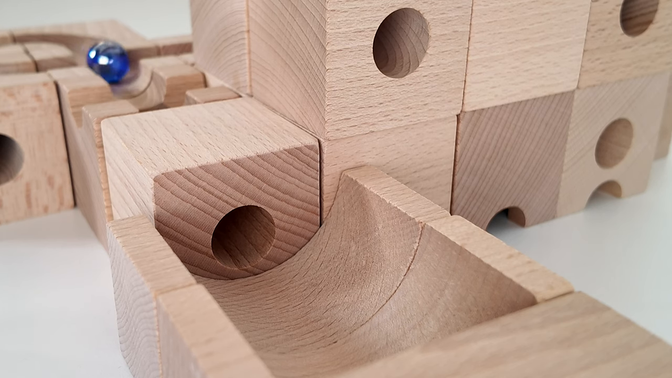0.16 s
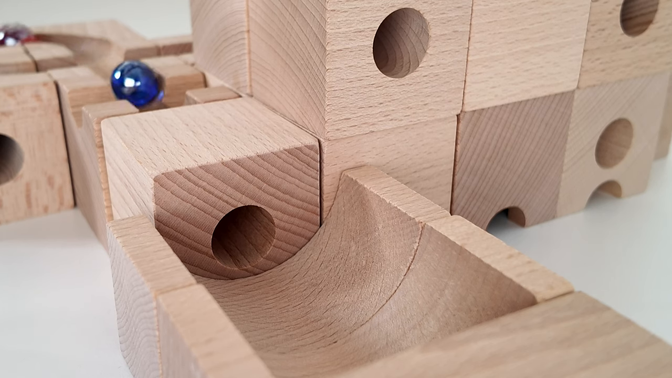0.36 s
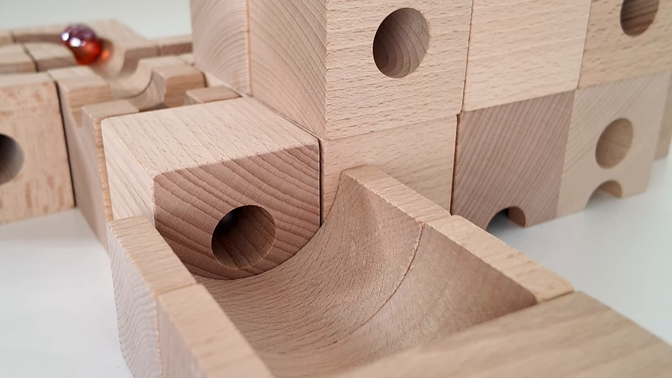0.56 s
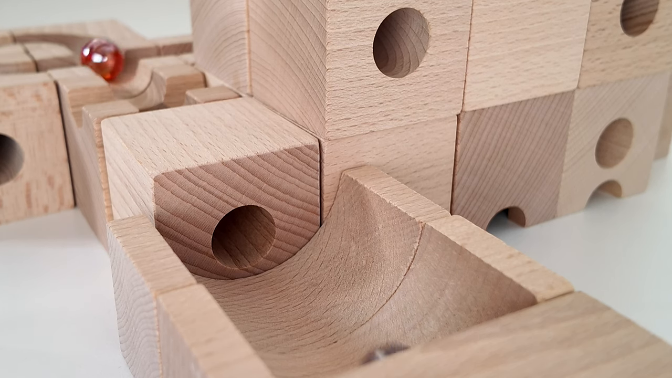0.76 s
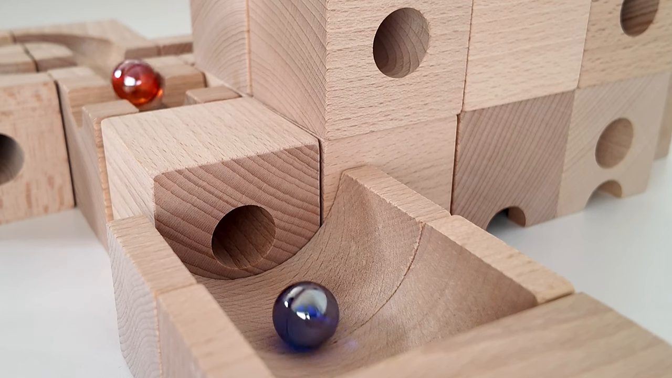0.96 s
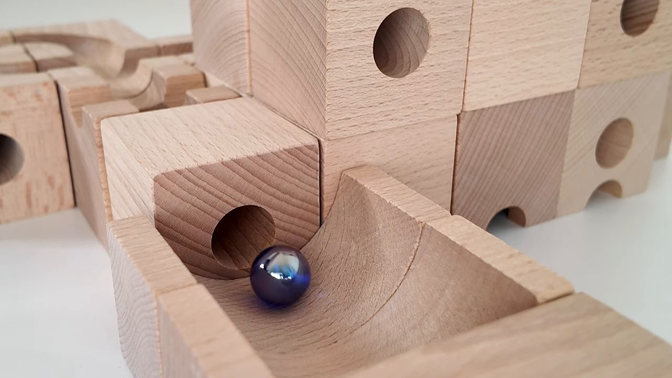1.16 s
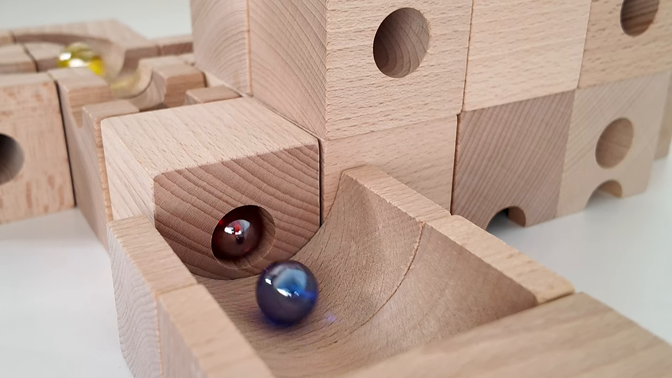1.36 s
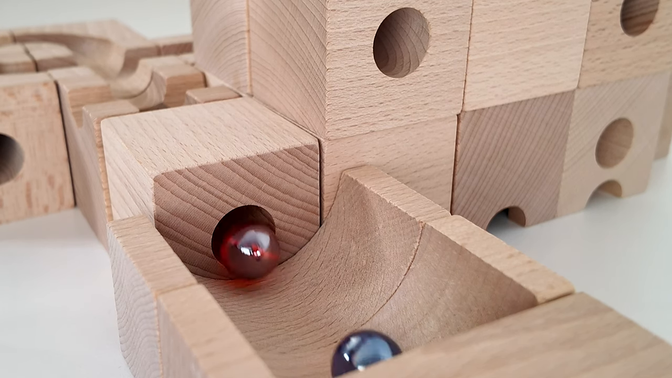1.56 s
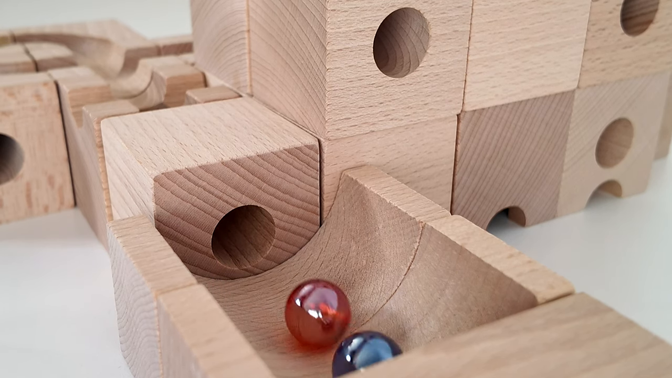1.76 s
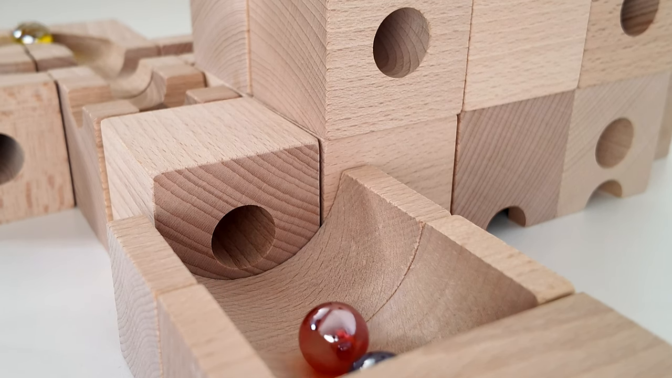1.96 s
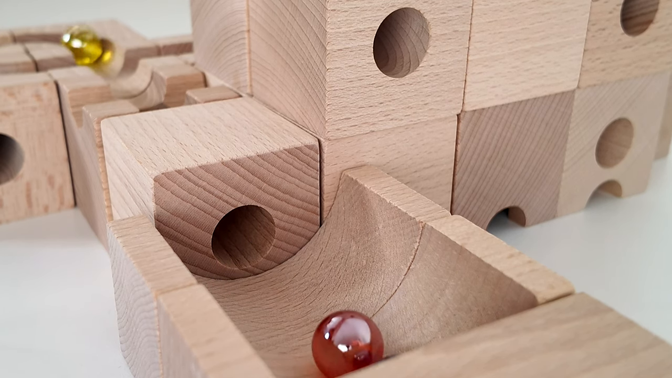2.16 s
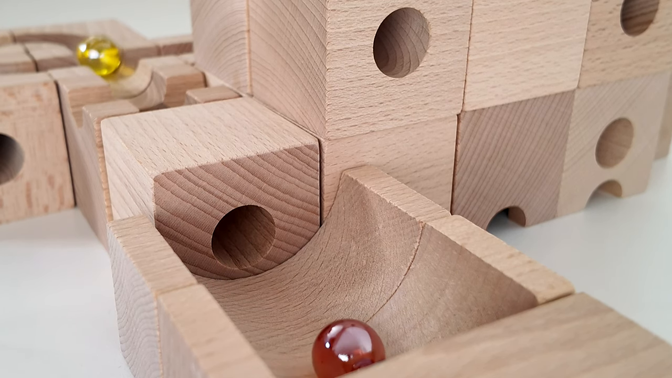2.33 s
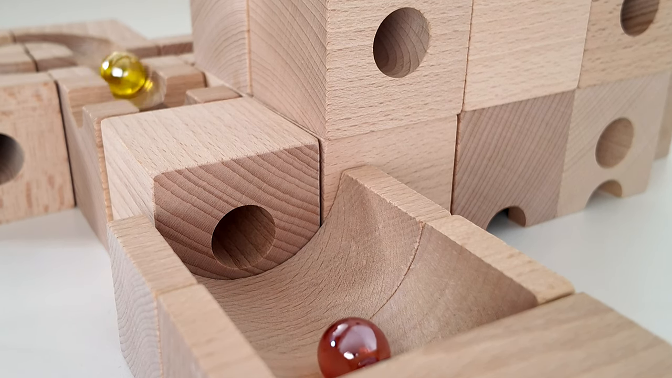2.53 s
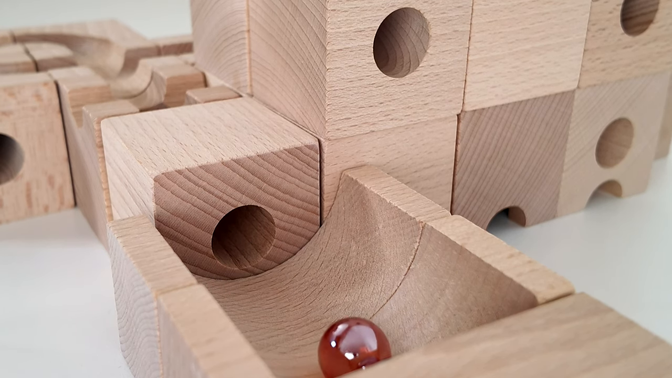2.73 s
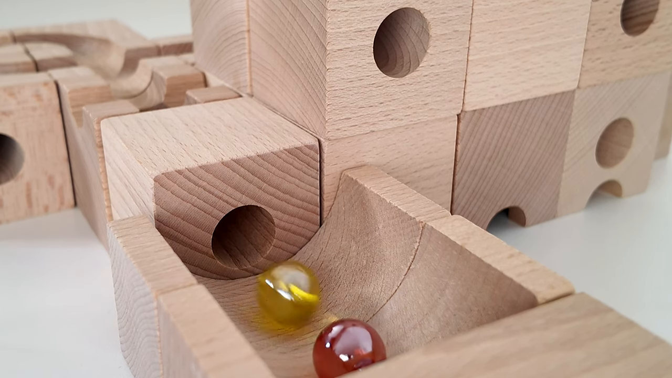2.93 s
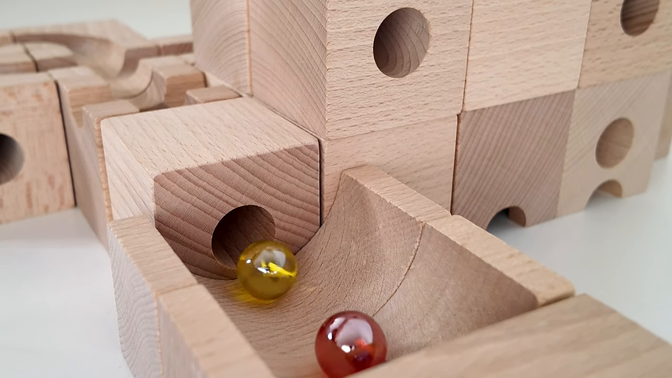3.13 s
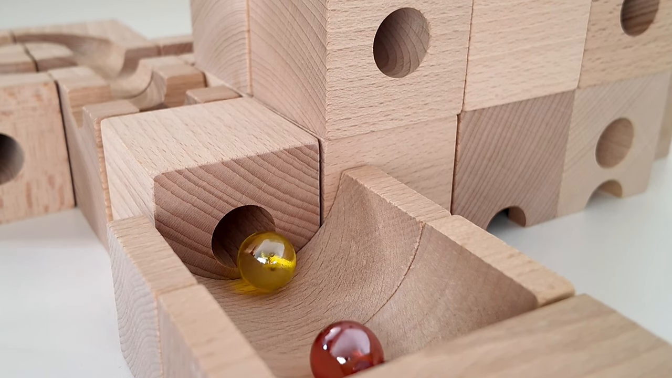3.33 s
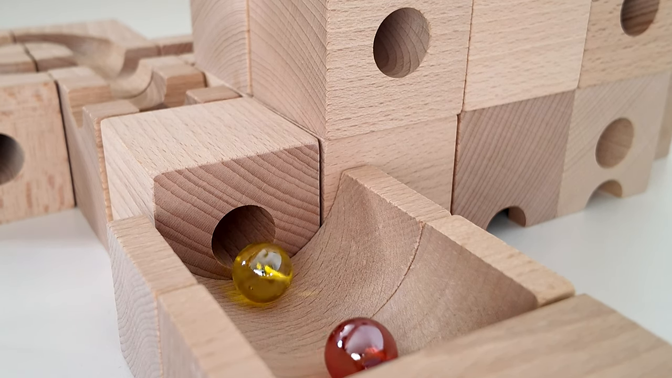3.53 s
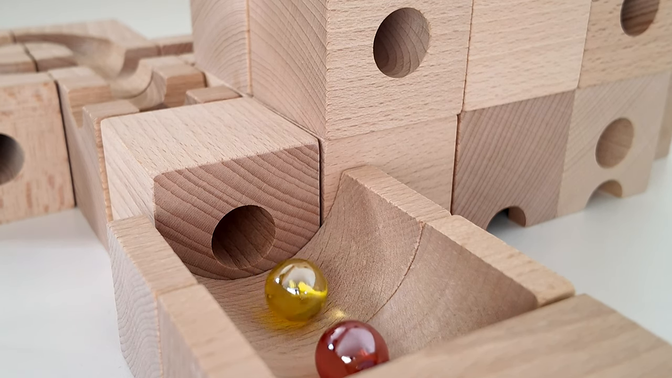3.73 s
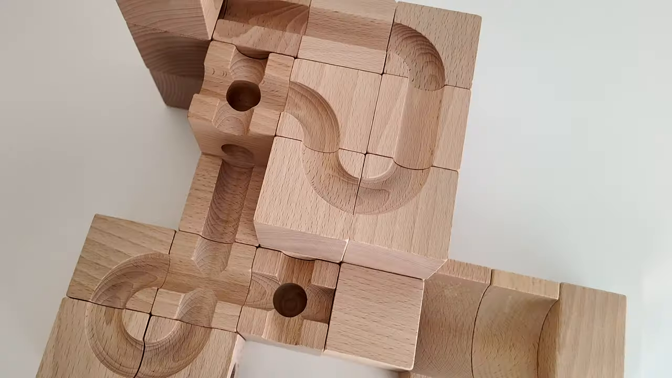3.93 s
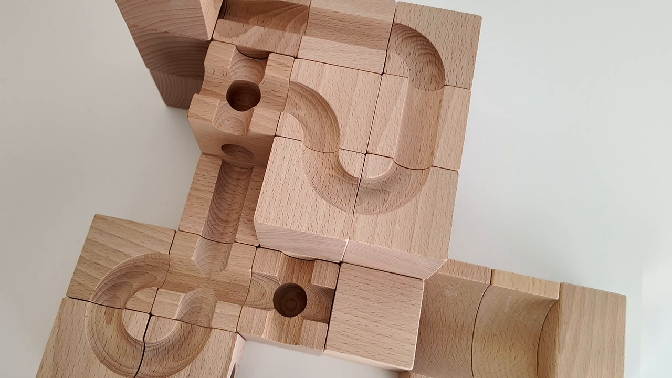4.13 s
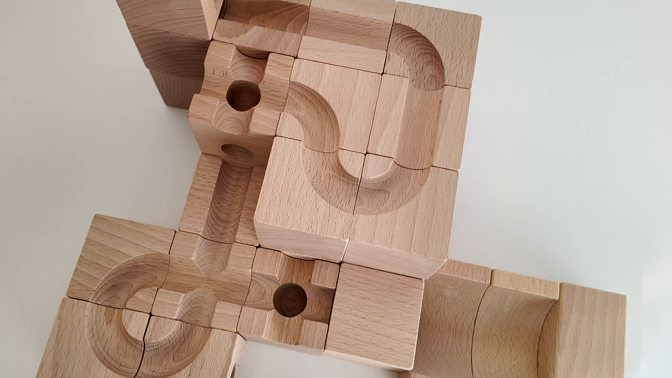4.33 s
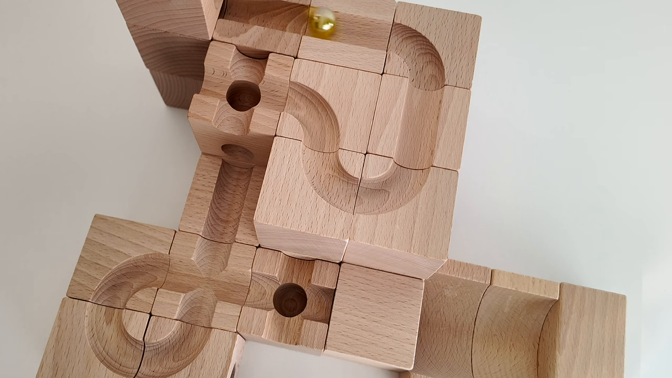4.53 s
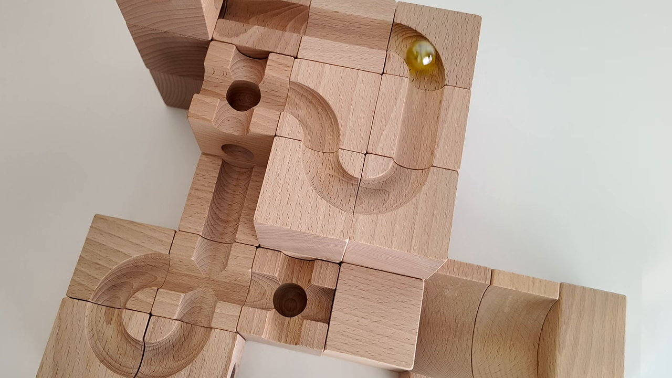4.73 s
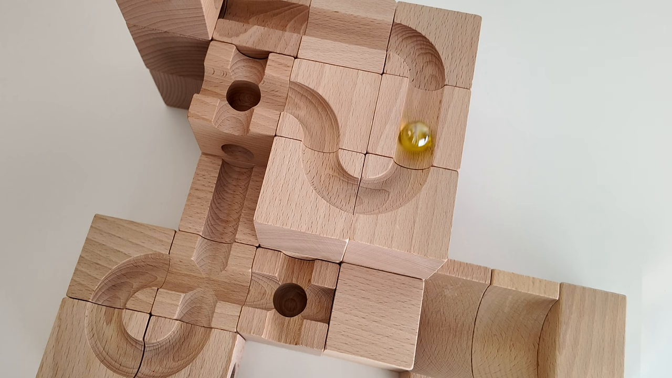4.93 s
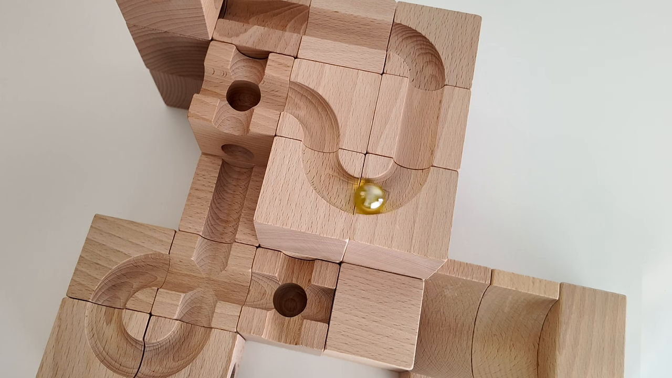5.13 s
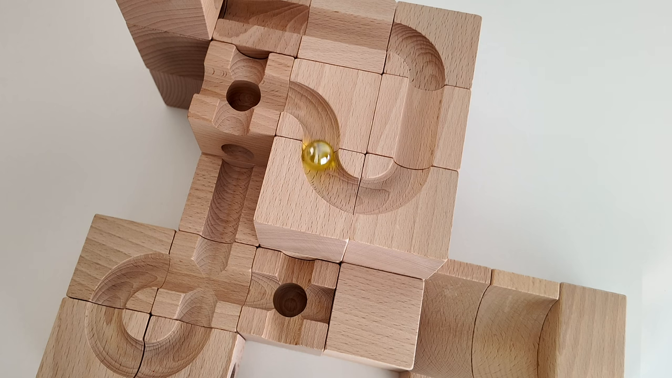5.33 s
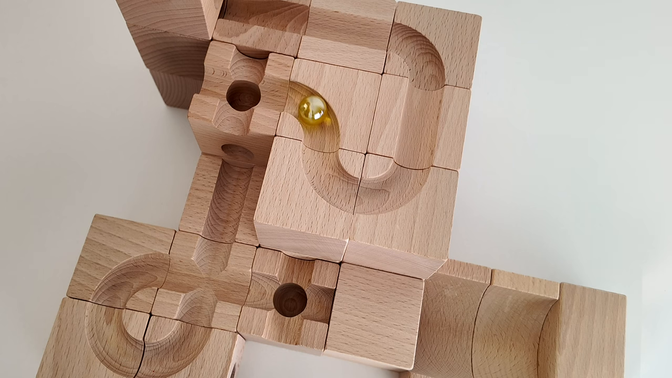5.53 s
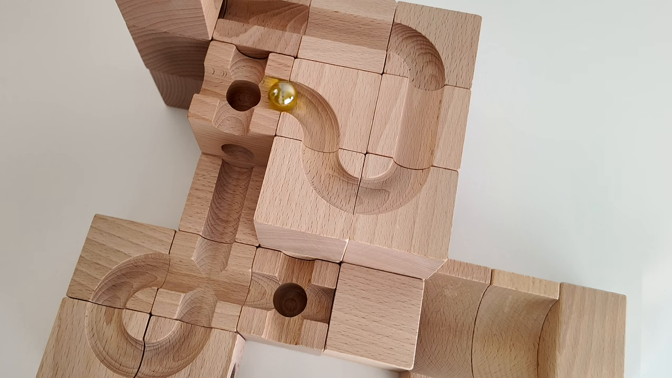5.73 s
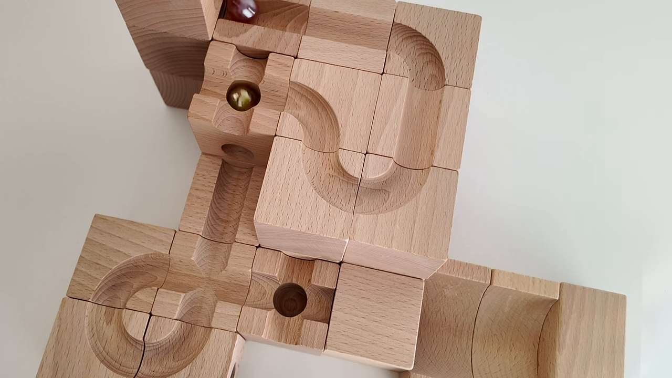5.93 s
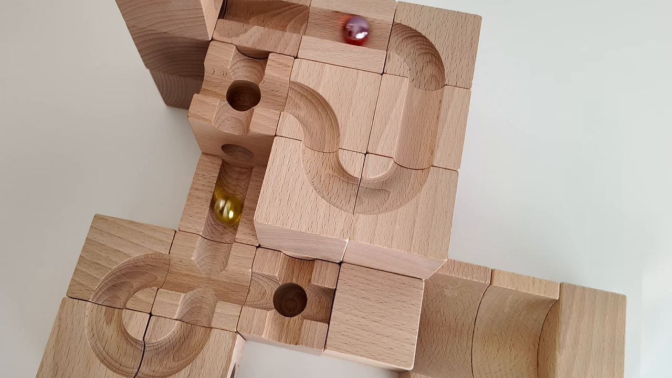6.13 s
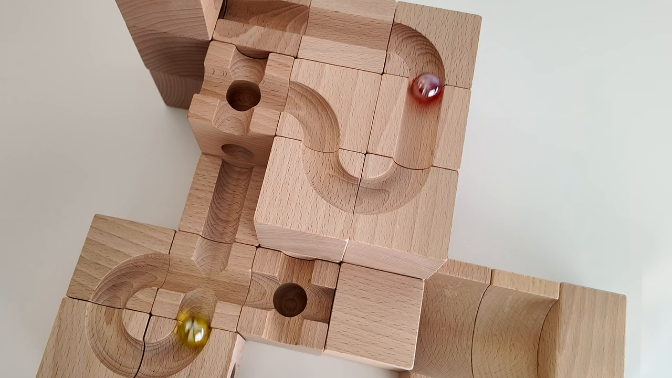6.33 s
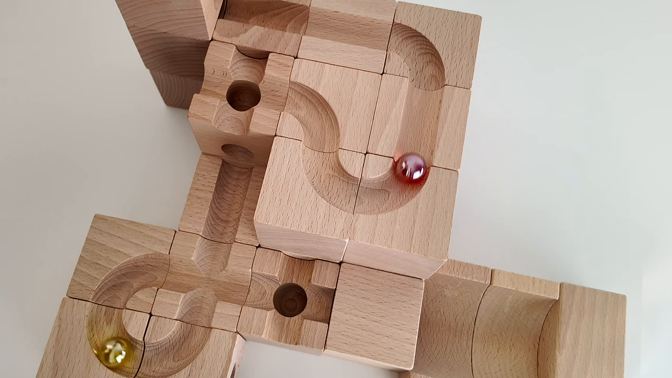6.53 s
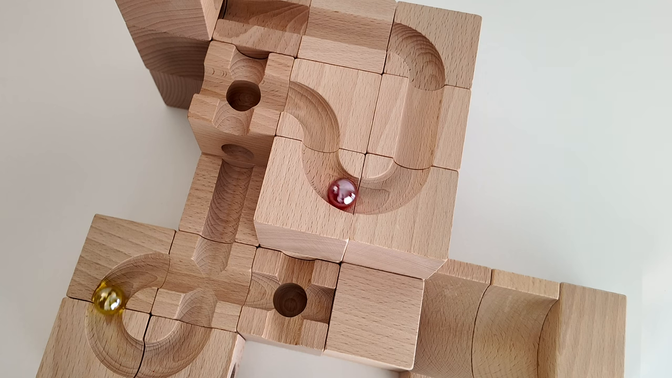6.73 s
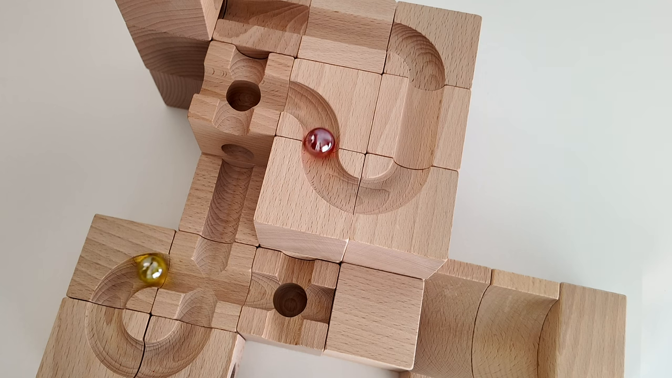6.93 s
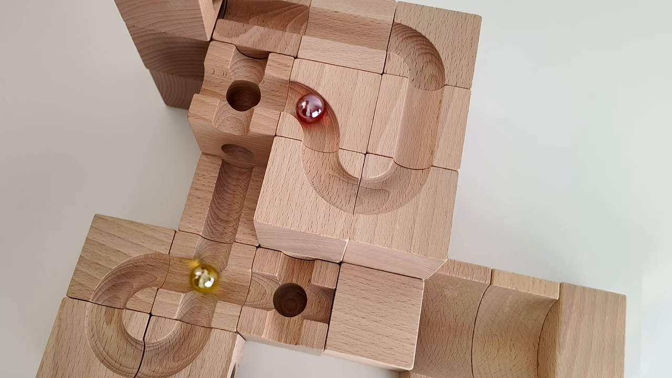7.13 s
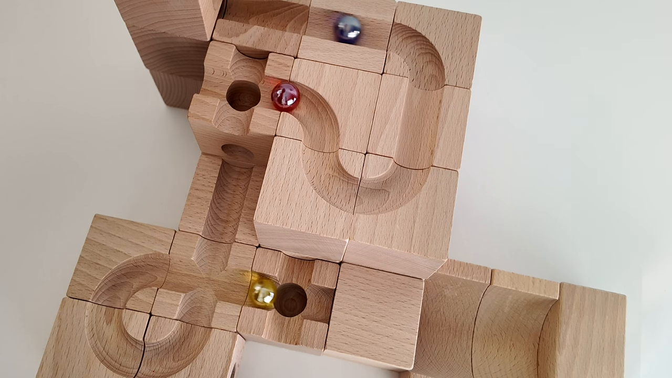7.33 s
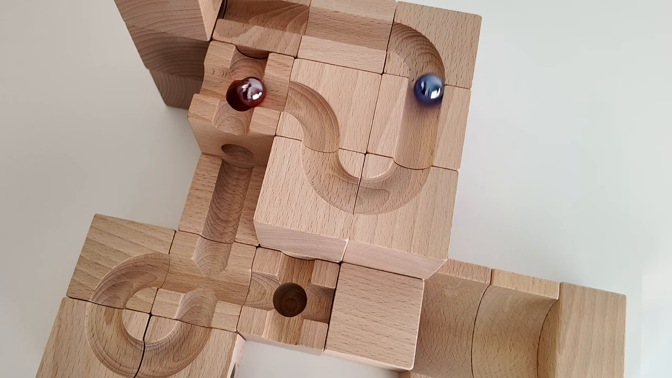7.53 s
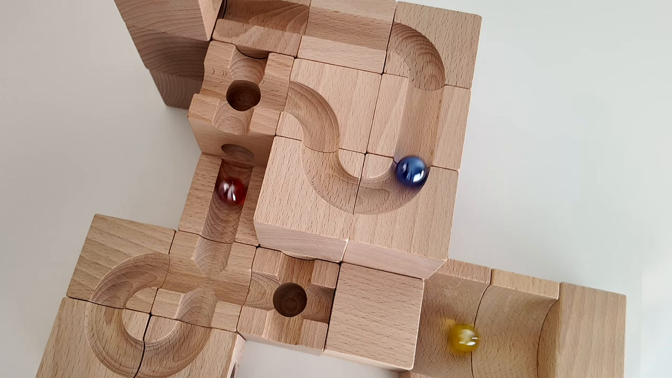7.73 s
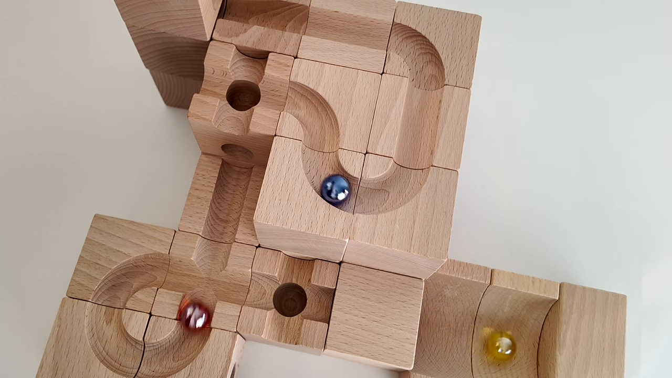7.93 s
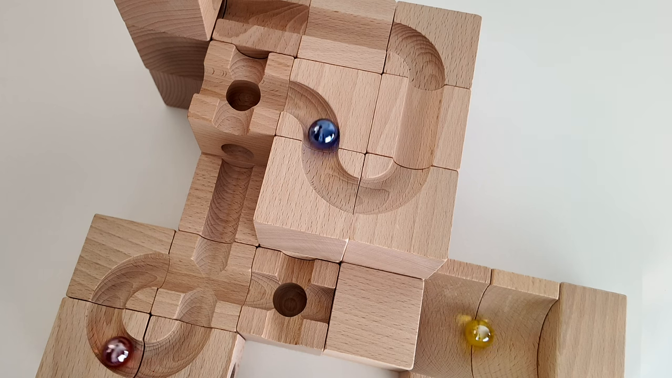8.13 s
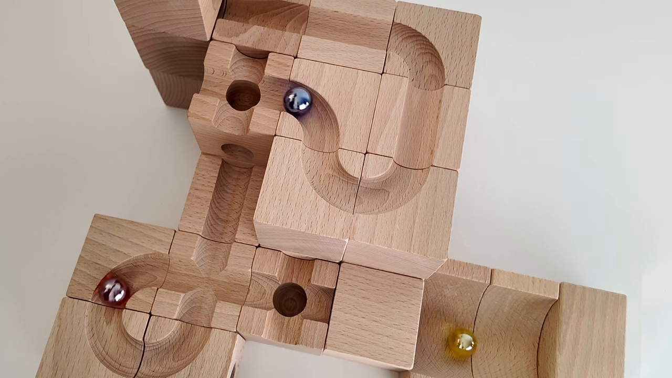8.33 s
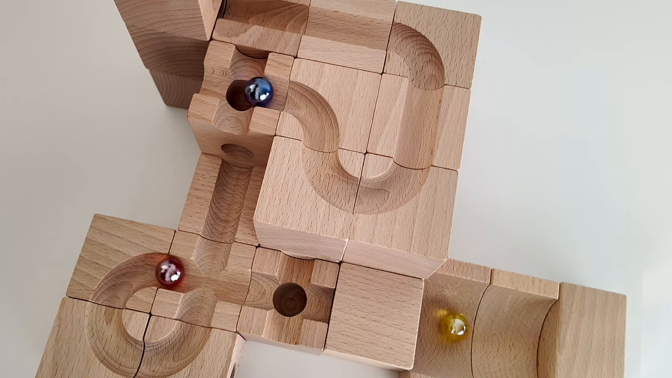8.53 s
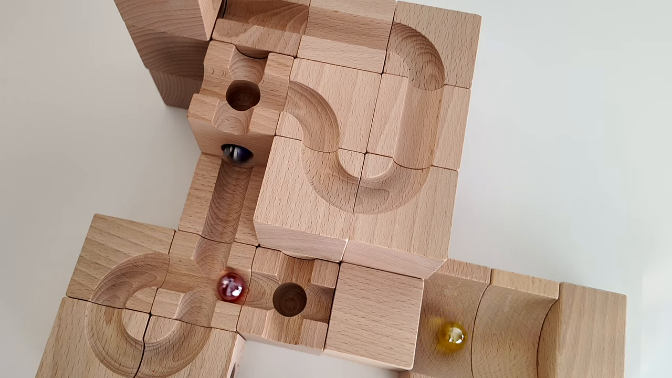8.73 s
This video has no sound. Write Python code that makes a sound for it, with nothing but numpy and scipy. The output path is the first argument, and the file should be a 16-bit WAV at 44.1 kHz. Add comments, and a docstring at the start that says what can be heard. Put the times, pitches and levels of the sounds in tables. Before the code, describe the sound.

Glass marbles rumble along hardwood grooves, knock sharply through hollow wooden blocks, bounce in a wooden basin and click together in a quiet room.

```python
"""In a quiet room, glass marbles run through a track of hardwood blocks close to the microphone.
They rumble along grooves, bump over joints, rattle down the bores of hollow blocks,
bounce in a ringing wooden basin and click against each other.
Each wooden part is a bank of fading sine tones plus a snap; rolling and glass are shaped noise.
Faint background noise and the echo of the room surround them."""
import sys
import numpy as np
from scipy import signal
from scipy.fft import rfft, irfft, next_fast_len
from scipy.io import wavfile
from scipy.ndimage import uniform_filter1d, map_coordinates

SR = 44100
rng = np.random.default_rng(int(sys.argv[2]) if len(sys.argv) > 2 else 0)


def write(x):
    x = np.atleast_2d(x).T
    wavfile.write(sys.argv[1], SR, np.round(np.clip(x, -1, 1) * 32767).astype(np.int16))


N = 387198
TOP_HZ = 16300  # nothing is kept above this
RING = np.arange(SR // 4) / SR  # seconds since a contact

# In the tables, t60_s is the time to fade by 60 dB. Contact levels are relative:
# scene() later turns whole parts up or down.

# Colour of the background noise: pitch_hz, density_db (per Hz)
AIR = [(15, -36.5), (25, -2.5), (70, 7.5), (263, -10), (309, -11), (405, -10.5), (1040, -15.5),
       (11300, -27), (14800, -26), (16000, -38.5)]
# A brief dip in the background level: time_s, change_db
BACKGROUND_DIP = [(3.87, 1.5), (3.905, -12), (3.94, 1)]
# How long the room's echo lasts: pitch_hz, t60_s
ROOM_DECAY = [(150, .45), (600, 0.32), (3500, 0.31), (8000, .33), (15000, 0.04)]

# Stretches of rolling: start_s, end_s, level_db, slowing_db_per_s
ROLLS = [(-.1, 1.034, -44, 4), (1.15, 2.45, -42.5, 15.5), (2.495, 2.58, -56.5, 2), (2.8, 2.92, -43, 4),
         (3.35, 3.857, -77, -0.5), (4.3, 5.43, -49, 2.5), (5.86, 7.4, -42, 6.5), (7.603, 8.793, -42.5, 9.5)]
# Colour of the rumble in the groove: pitch_hz, density_db (per Hz)
GROOVE = [(50, -27.5), (100, -4), (140, -13), (250, -3.5), (400, 1.5), (600, 1), (850, -3), (1200, -14),
          (2000, -29), (4000, -43), (9000, -54.5)]
# Resonances of the assembled blocks, added to the plain rumble: pitch_hz, width_hz, added_db
FRAME = [(200, 15, 6), (268.6, 18, 9), (336, 8, -10.5), (580, 18, -3)]

# Marble against marble: time_s, level_db
GLASS_HITS = [(1.3745, -30.5), (1.8889, -36.5), (2.099, -45.5), (2.302, -50), (2.339, -56), (2.375, -60),
              (3.0441, -27.5), (3.3803, -48), (3.483, -68), (4.702, -60.5)]
# Colour of the glass click: pitch_hz, density_db (per Hz)
GLASS_COLOUR = [(300, -3.5), (1500, 0), (2500, -2.5), (4000, -10), (7000, 1), (9500, -1.5), (12000, -13.5),
                (14500, -17.5), (16000, -26.5)]

# The broad crowd of wood tones in each part: pitch_hz, density_db (per Hz)
BLOCK_BODY = [(50, -29.5), (100, -9), (250, 0), (600, 3), (1300, 7.5), (2000, 0), (3200, -7.5), (4200, -21),
              (7500, -25.5), (10000, -34.5), (12500, -42.5), (16000, -47.5)]
BASIN_BODY = [(50, -21), (110, -0.5), (400, -8.5), (700, 5.5), (1000, -3.5), (1400, 8), (1900, -2),
              (2600, -7), (3500, -11), (4400, -42.5), (10000, -45.5), (16000, -56)]
TOWER_BODY = [(50, -61.5), (90, 1), (200, 6.5), (600, 2.5), (1400, 4.5), (1800, -3.5), (3000, -2),
              (4200, -13), (6000, -17.5), (9000, -27), (12000, -35), (16000, -44.5)]
TRACK_BODY = [(50, -50), (100, -1.5), (200, -3), (550, 2.5), (1100, 7), (1700, -4), (2700, -5.5),
              (4200, -22.5), (6500, -31.5), (10000, -39), (12500, -47.5), (16000, -65)]
# How long the crowd rings, before division by each part's damping: pitch_hz, t60_s
WOOD_DECAY = [(100, 0.14), (300, .1), (700, 0.063), (1500, 0.061), (3500, 0.034), (10000, .018)]
# Tones that stand out from the crowd: pitch_hz, energy_db (against the whole crowd), t60_s
BLOCK_MODES = [(646.5, -6, 0.041), (1217, -7, 0.074), (2985, -21, 0.077), (6930, -41.5, .09)]
BASIN_MODES = [(1404, -7, 0.022), (1900, -2.5, 0.013), (3540, -15, 0.11), (3425, -19, 0.03),
               (3520, -4, 0.025), (6900, -40.5, 0.047)]
TOWER_MODES = [(192, -15.5, 0.14), (292.6, -22, 0.43), (593, -6.5, 0.036), (985.5, -15.5, 0.16),
               (1343, -6.5, 0.038), (2466, -15.5, 0.023), (7650, -32.5, 0.05)]
TRACK_MODES = [(188.5, -16.5, 0.76), (555, -6, 0.045), (970, -17.5, 0.021), (1507, -11.5, 0.039),
               (2400, -30.5, 0.032), (6630, -42.5, 0.02), (9800, -38.5, .015)]
# Extra tones of the tower's top block alone: pitch_hz, energy_db, t60_s
MOUTH_MODES = [(1375, -11, 0.08), (5690, -16.5, 0.051), (5850, -19, 0.073), (5990, -24.5, 0.065)]
# Extra tones of the hollow cube alone: pitch_hz, energy_db, t60_s
CUBE_MODES = [(5550, -27.5, 0.031), (5560, -30, 0.033), (5800, -34, .05)]

# Knocks on each part; the cube feeds the basin: time_s, level_db, hardness_db (more is brighter)
BLOCK_KNOCKS = [(.0347, -19, 8), (.0489, -26.5, -16), (.0763, -32, -3), (.529, -38, 5), (.5452, -13, 9.5),
                (.5662, -32.5, 9.5), (.58, -27, -0.5), (.8512, -23, -1.5), (1.9885, -35.5, 10.5),
                (2.2311, -49.5, -4), (2.6469, -32, -17), (3.0409, -22, 7.5)]
CUBE_KNOCKS = [(1.1053, -38, 19.5), (1.1217, -16, 12.5), (1.1292, -25, 16.5), (1.1483, -23.5, 13.5),
               (1.1614, -23.5, 10), (1.1692, -25.5, 2), (1.2071, -24, 5.5), (1.2476, -18.5, 11.5),
               (1.2571, -27, 5.5), (1.2711, -27.5, 3), (1.3215, -26, -7.5), (1.3629, -28, -2),
               (1.4721, -24.5, -6.5), (1.5034, -23.5, -7.5), (2.7731, -38, 3.5), (2.7896, -19, 6.5),
               (2.7958, -24, 2.5), (2.8268, -25.5, 2), (2.8537, -25.5, -3.5)]
TOWER_KNOCKS = [(4.3086, -16.5, 6.5), (4.399, -27.5, 0.5), (4.4671, -28, -2), (4.4722, -31.5, -4),
                (4.54, -30.5, -7), (4.5893, -38, -6), (5.8631, -16, -0.5), (5.8862, -23.5, 1),
                (5.9256, -27.5, -7.5), (7.2225, -26, -11), (7.2504, -24, -1.5), (7.2699, -25.5, 5),
                (7.33, -29, -5), (7.3804, -25.5, -1.5)]
TRACK_KNOCKS = [(5.0937, -35, 2), (6.0231, -19, 14.5), (6.035, -15, 15.5), (6.0839, -22.5, 8),
                (6.1237, -27.5, 12), (6.16, -24, 13), (6.1765, -16.5, 14.5), (6.2306, -22.5, 0),
                (6.2602, -27.5, 3), (6.4239, -28.5, -2), (6.4306, -29.5, 1.5), (7.509, -27, 9),
                (7.5237, -19, 13.5), (7.5387, -19.5, 14), (7.5912, -23, 16), (7.6121, -24.5, -15),
                (7.6835, -16, 13.5), (7.8177, -16.5, 9.5), (7.876, -24, -3), (7.8936, -22.5, 4),
                (8.0498, -26.5, -3), (8.0989, -29, -5.5), (8.1761, -27, -9.5), (8.7002, -39, 28),
                (8.7189, -15, 12.5), (8.7424, -24, 14)]
# Marbles that bounce: time_s, level_db, hardness_db, first_flight_s, loss_per_bounce_db
BASIN_LANDINGS = [(.7233, -15.5, 10.5, .0271, 10.5), (.7788, -24.5, -8, 0.0084, 20),
                  (.8133, -19.5, 0, 0.025, 5.5), (.8663, -27, 0, 0.016, 10.5),
                  (1.3734, -23.5, -6, .017, 9.5), (1.6634, -19, 10, 0.026, 6),
                  (2.9814, -15, 12.5, 0.025, 8.5), (3.0854, -19, 9, .0251, 5.5),
                  (7.7614, -15.5, 6.5, 0.025, 8.5), (7.8673, -20, -4, 0.022, 14.5),
                  (7.9107, -27.5, 5.5, 0.021, -1)]
TOWER_DROPS = [(4.2008, -18, -15.5, .0137, 7.9), (5.7528, -17.5, -12.5, 0.012, 6.3),
               (7.0932, -20.5, -4.5, .0102, 3.6)]
# Light touches while falling down the tower's bore: time_s, level_db
BORE_TOUCHES = [(4.2664, -37), (4.2927, -48.5), (5.8427, -39)]
# Soft bumps over the joints between blocks: time_s, level_db
BLOCK_JOINTS = [(.1261, -32.5), (.1923, -32.5), (.4046, -32.5), (.9226, -33.5), (1.027, -38), (1.8655, -35),
                (2.3215, -47), (2.8749, -28), (2.9182, -34.5)]
TRACK_JOINTS = [(4.8664, -48), (5.1043, -36.5), (5.4417, -41), (6.4721, -40.5), (6.5494, -32),
                (6.6189, -34), (6.8164, -42.5), (6.998, -48.5), (7.4724, -36), (8.0325, -38), (8.1631, -32),
                (8.5349, -35.5), (8.5973, -41.5)]

ROLL_ATTACK_S, ROLL_RELEASE_DB_PER_S = 0.022, 93.5
# Grazes after a knock: typical gap, loss after a full-force knock, added hardness
GRAZE_GAP_S, GRAZE_LOSS_DB, GRAZE_HARDER_DB = .011, 18, 8
FULL_KNOCK_DB, GRAZE_FADE = -20.5, 0.19  # a full-force knock; extra loss for each dB below it
BASIN_SHRINK, BASIN_SOFTER_DB = .64, 9.5  # each flight as a share of the last; rebounds are duller
BORE_SHRINK, BORE_HARDER_DB = 0.99, 14.5  # ricochets in the bore are brighter than the tip over its rim
CLACK_SHARE, TOP_LOSS_DB = 0.53, 6  # share of the hardness felt at 2.7 kHz; loss at 14 kHz
SPOT_COLOUR_DB, SPOT_MODE_DB = 2.2, 2.5  # how much crowd colour and each mode differ by spot


def amp(db):
    """Turn decibels into gain."""
    return 10 ** (np.asarray(db) / 20)


def unit(x):
    """Scale to an average (rms) level of 1."""
    return x / np.sqrt(np.mean(x ** 2) + 1e-20)


def along(points, hz):
    """Read a table of (pitch, value) at any pitch, on a log pitch axis."""
    pitch_hz, value = np.transpose(points)
    return np.interp(np.log(hz + 1), np.log(pitch_hz), value)


def filtered(x, gain):
    """Apply a gain that depends on pitch."""
    size = next_fast_len(len(x) + 8192)
    spectrum = rfft(x, size) * gain(np.fft.rfftfreq(size, 1 / SR))
    return irfft(spectrum, size)[:len(x)]


def coloured(x, colour):
    """Give a sound the colour of a table, at rms 1."""
    return unit(filtered(x, lambda hz: amp(along(colour, hz))))


def wobble(rate):
    """A smooth random curve with this many random points a second."""
    points = rng.standard_normal(int(N * rate / SR) + 4)
    return map_coordinates(points, [np.arange(N) * rate / SR])


def add(out, s, db, sound):
    """Place a contact sound so that the rms of its first 7 ms has the given level."""
    head = np.sqrt(np.mean(sound[:int(.007 * SR)] ** 2))
    place = out[max(round(s * SR), 0):][:len(sound)]
    place += amp(db) / head * sound[:len(place)]


def background():
    """Faint coloured noise whose level dips briefly."""
    level_db = -72.5 + np.interp(np.arange(N) / SR, *np.transpose(BACKGROUND_DIP))
    return amp(level_db) * coloured(rng.standard_normal(N), AIR)


def room(x, count=70):
    """The room's echo is fading noise, drawn anew for each short stretch of the marbles' way."""
    out = np.zeros(N + SR)
    for part in np.array_split(np.arange(N), count):
        hz, t, noise = signal.stft(rng.standard_normal(SR // 2), SR, nperseg=256)
        fade = amp(-60 * t / along(ROOM_DECAY, hz)[:, None])
        tail = signal.istft(noise * fade, SR, nperseg=256)[1]
        tail *= 1 - np.exp(-(np.arange(len(tail)) / SR / 0.012) ** 2)  # the walls answer after a few ms
        answer = signal.fftconvolve(x[part], tail / np.linalg.norm(tail))
        out[part[0]:][:len(answer)] += answer
    return out[:N]


def roll_level(t):
    """Rolling level in dB: each stretch sets in quickly, sinks as friction slows the marble, and dies away."""
    power = 1e-12
    for start, end, db, slowing in ROLLS:
        level_db = db - slowing * np.maximum(t - start, 0)
        level_db = level_db - ROLL_RELEASE_DB_PER_S * np.maximum(t - end, 0)
        attack = np.clip((t - start) / ROLL_ATTACK_S, 0, 1)
        power = power + (attack * amp(level_db)) ** 2
    return 10 * np.log10(power)


def frame_gain(hz):
    """The assembled blocks add resonances to the plain sound of rolling."""
    gain = 1
    for centre, width, db in FRAME:
        gain = gain + amp(db) * 1j * hz * width / (centre ** 2 - hz ** 2 + 1j * hz * width)
    return gain


def rolling(bumps_per_s, scatter_db, sway_db):
    """Tiny bumps over the wood grain merge into a rumble that sways as the marbles swing in the groove."""
    level_db = roll_level(np.arange(N) / SR)
    happens = rng.random(N) < bumps_per_s / SR
    bumps = happens * rng.standard_normal(N) * amp(scatter_db * rng.standard_normal(N))
    rumble = coloured(filtered(bumps, frame_gain), GROOVE)
    return amp(level_db + sway_db * wobble(rate=22)) * rumble


def glass(t60, rebound_db, rebound_t60):
    """Glass on glass is a very short bright snap, scattered briefly by the basin's walls."""
    out = np.zeros(N)
    shape = amp(-60 * RING / t60) + amp(rebound_db - 60 * RING / rebound_t60)
    for s, db in GLASS_HITS:
        add(out, s, db, shape * coloured(rng.standard_normal(len(RING)), GLASS_COLOUR))
    return out


def touching(rows, hard_db):
    """Light contacts that share one hardness."""
    return [(s, db, hard_db) for s, db in rows]


def jolts(lift_db, scatter_db, hard_db, count=48):
    """Chance jolts against the groove's sides, stronger where the rolling is louder."""
    times = rng.uniform(0, (N - 1) / SR, count)
    levels = roll_level(times) + lift_db + scatter_db * rng.standard_normal(count)
    return touching(zip(times, levels), hard_db)


def bouncing(landings, shrink, harder_db, count):
    """Each landing and its rebounds: flights shorten by one ratio and the level changes in even steps."""
    hits = []
    for s, db, hard_db, flight, loss_db in landings:
        hits.append((s, db, hard_db))
        delays = np.cumsum(flight * shrink ** np.arange(count))
        for k, delay in enumerate(delays, 1):
            hits.append((s + delay, db - k * loss_db, hard_db + harder_db))
    return hits


def grazing(knocks, count=2):
    """After each knock the marble grazes the channel's walls: weaker, harder touches at uneven gaps."""
    hits = list(knocks)
    for s, db, hard_db in knocks:
        loss_db = GRAZE_LOSS_DB + GRAZE_FADE * (FULL_KNOCK_DB - db)
        gaps = GRAZE_GAP_S * np.exp(0.27 * rng.standard_normal(count))
        for k, delay in enumerate(np.cumsum(gaps)):
            hits.append((s + delay, db - loss_db - 4 * k, hard_db + GRAZE_HARDER_DB))
    return hits


def snap(colour, size):
    """The brief push and pull of air from a marble that is stopped dead, at energy 1."""
    doublet = np.fft.fftshift(irfft(1j * colour(np.fft.rfftfreq(size, 1 / SR)))) * np.hanning(size)
    return np.pad(doublet / np.linalg.norm(doublet), (0, len(RING) - size))


def ringing(hz, t60, rise):
    """One fading sine of equal energy per mode, swelling while the marble presses into the wood."""
    t, hz, t60 = (np.asarray(v, "float32") for v in (RING, hz[:, None], t60[:, None]))
    press = 1 - np.exp(-(t / rise) ** 2)
    fade = np.exp(np.maximum(-float(np.log(1000)) * t / t60, -30))
    return press * np.sin(2 * np.pi * hz * t) * fade / np.sqrt(t60)


def hardness_gain(hz, hard_db):
    """A harder contact is shorter, so it excites more treble."""
    curve = [(1100, 0), (2700, CLACK_SHARE * hard_db), (6000, hard_db), (10000, hard_db),
             (14000, hard_db - TOP_LOSS_DB), (17000, -17.5)]
    return amp(along(curve, hz))


def wood(hits, body, modes, damping, alike, snap_db, count=560, size=128):
    """Marbles strike one wooden part; each spot excites its modes at other strengths."""
    crowd_hz = np.linspace(np.sqrt(50), np.sqrt(TOP_HZ), count) ** 2 * rng.uniform(.994, 1.006, count)
    crowd = amp(along(body, crowd_hz)) * np.sqrt(np.sqrt(crowd_hz))  # higher modes lie further apart
    crowd /= np.linalg.norm(crowd)
    crowd_t60 = along(WOOD_DECAY, crowd_hz) / damping * np.exp(.25 * rng.standard_normal(count))
    mode_hz, mode_db, mode_t60 = np.transpose(modes)
    hz = np.r_[crowd_hz, mode_hz]
    bank = ringing(hz, np.r_[crowd_t60, mode_t60], rise=0.00027)
    usual = rng.standard_normal(count)  # the part's own pattern, shared by all its contacts
    lead = size // 2  # the wood starts to ring at the middle of the snap
    out = np.zeros(N)
    for s, db, hard_db in hits:
        spot = np.sqrt(alike) * usual + np.sqrt(1 - alike) * rng.standard_normal(count)
        spot *= amp(SPOT_COLOUR_DB * unit(uniform_filter1d(rng.standard_normal(count), size=40)))
        mode_strength = amp(mode_db + SPOT_MODE_DB * rng.standard_normal(len(modes)))
        strength = np.r_[crowd * spot, mode_strength] * hardness_gain(hz, hard_db)
        ring = strength.astype(bank.dtype) @ bank
        click = snap(lambda f: hardness_gain(f, hard_db) * amp(along(body, f)), size)
        click *= amp(snap_db) * np.linalg.norm(ring)
        add(out, s - lead / SR, db, click + np.pad(ring, (lead, 0))[:len(RING)])
    return out


def scene():
    """Mix all sources; parts that face away from the microphone are heard more through the room."""
    air = background()
    roll = rolling(bumps_per_s=1100, scatter_db=2.5, sway_db=1.5)
    clicks = amp(-1) * glass(t60=0.0023, rebound_db=-18.5, rebound_t60=0.059)

    block_hits = grazing(BLOCK_KNOCKS) + touching(BLOCK_JOINTS, hard_db=-12)
    blocks = amp(-2.0) * wood(block_hits, BLOCK_BODY, BLOCK_MODES, damping=2.1, alike=0.11, snap_db=-10.5)

    cube = wood(grazing(CUBE_KNOCKS), BLOCK_BODY, BLOCK_MODES + CUBE_MODES,
                damping=1.3, alike=0.095, snap_db=-4)

    basin_hits = bouncing(BASIN_LANDINGS, BASIN_SHRINK, -BASIN_SOFTER_DB, count=2)
    basin = amp(-1.0) * wood(basin_hits, BASIN_BODY, BASIN_MODES, damping=1.5, alike=0.77, snap_db=-16)

    drop_hits = bouncing(TOWER_DROPS, BORE_SHRINK, BORE_HARDER_DB, count=4)
    drop_hits += touching(BORE_TOUCHES, hard_db=7.5)
    drops = wood(drop_hits, TOWER_BODY, TOWER_MODES + MOUTH_MODES, damping=0.95, alike=0.16, snap_db=-24.5)
    knocks = wood(grazing(TOWER_KNOCKS), TOWER_BODY, TOWER_MODES, damping=0.9, alike=0.34, snap_db=-14.5)
    tower = amp(-1.37) * (drops + knocks)

    track_hits = grazing(TRACK_KNOCKS) + touching(TRACK_JOINTS, hard_db=-11.5)
    track_hits += jolts(lift_db=3.5, scatter_db=2.5, hard_db=-22)
    track = amp(-1.0) * wood(track_hits, TRACK_BODY, TRACK_MODES, damping=1.2, alike=0.095, snap_db=-7)

    # How much of each source reaches the room's walls
    sent = amp(-16.5) * blocks + amp(-18.5) * cube + amp(-19.5) * basin
    sent += amp(-14.5) * tower + amp(-17) * track + amp(-16) * clicks
    return (air + room(sent) + roll + clicks + blocks + cube + basin + tower + track)[None]


def record(dry):
    """The recorder cuts the deepest bass and keeps nothing above its band limit."""
    bass_cut = signal.butter(4, 66, "highpass", fs=SR, output="sos")
    thinned = signal.sosfilt(bass_cut, dry[0])
    return filtered(thinned, lambda hz: hz < TOP_HZ)[None]


dry = scene()
out = record(dry)
write(out)
```